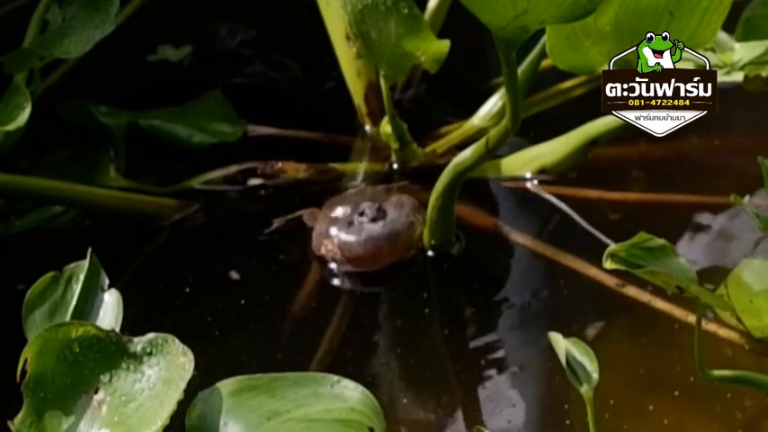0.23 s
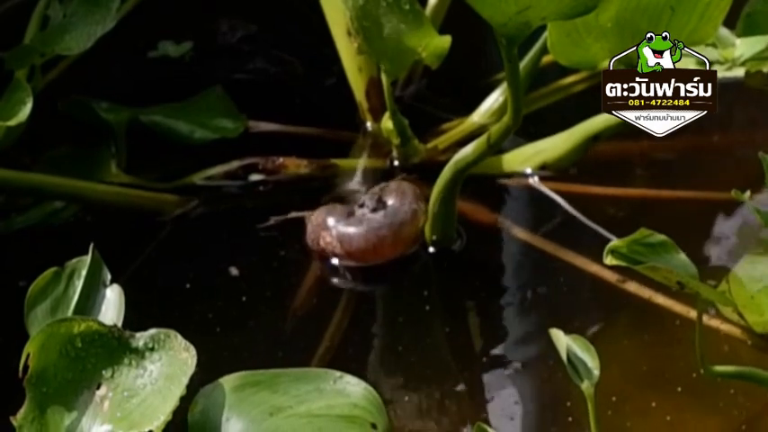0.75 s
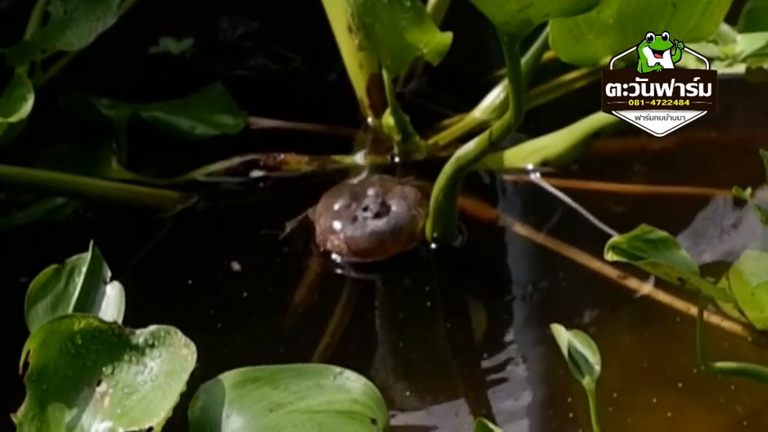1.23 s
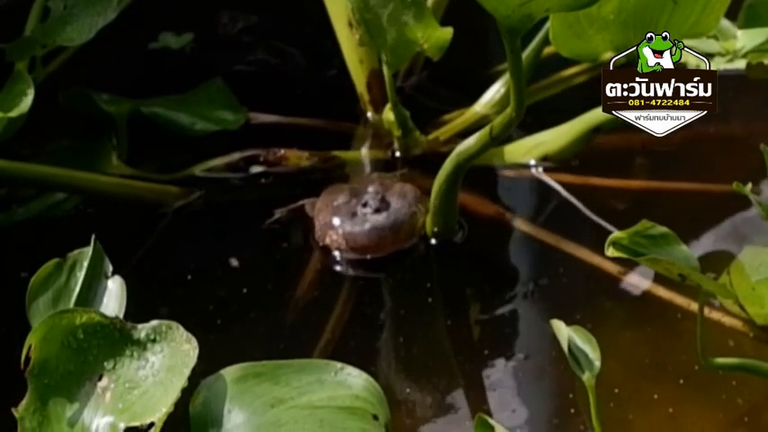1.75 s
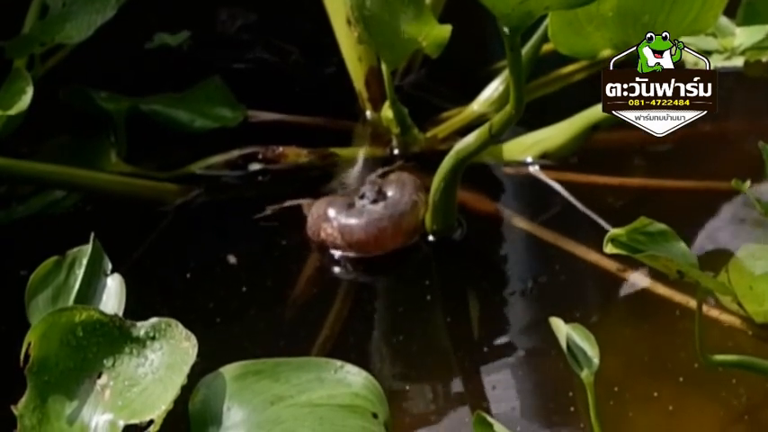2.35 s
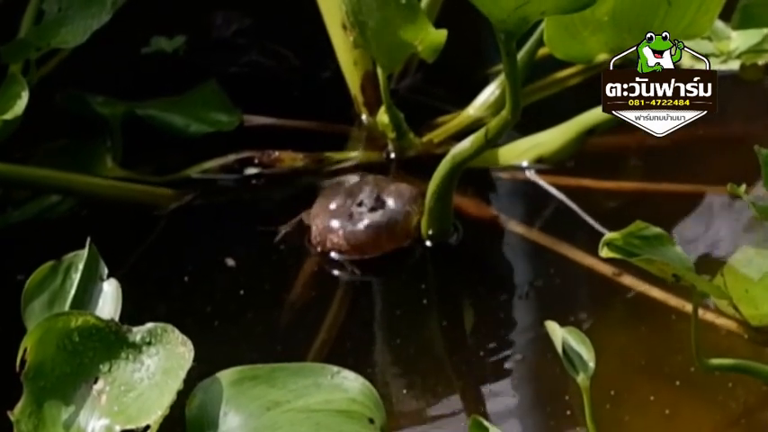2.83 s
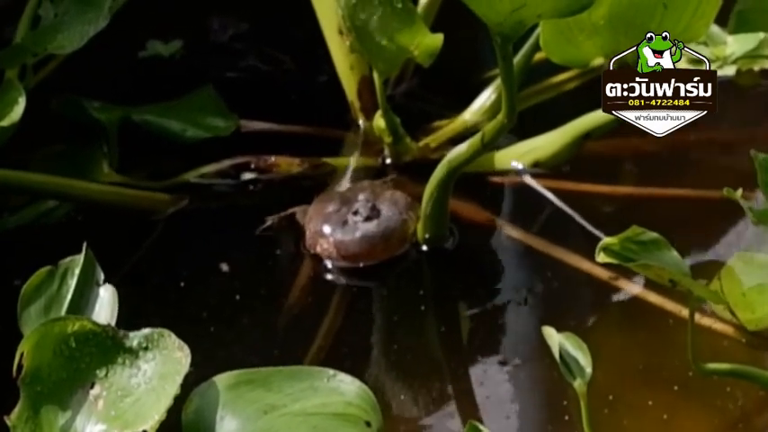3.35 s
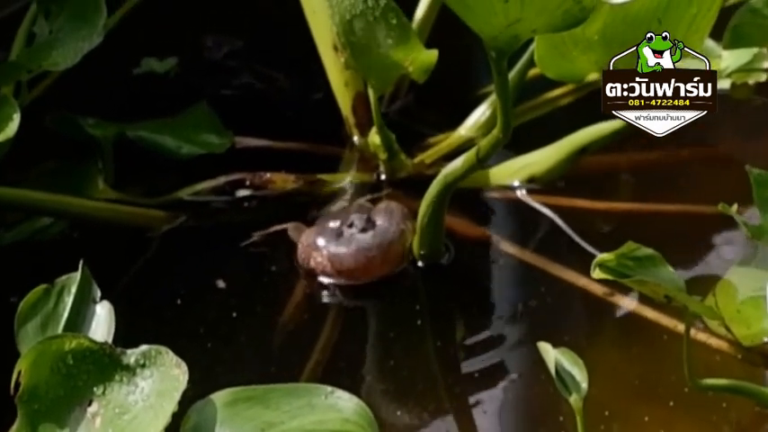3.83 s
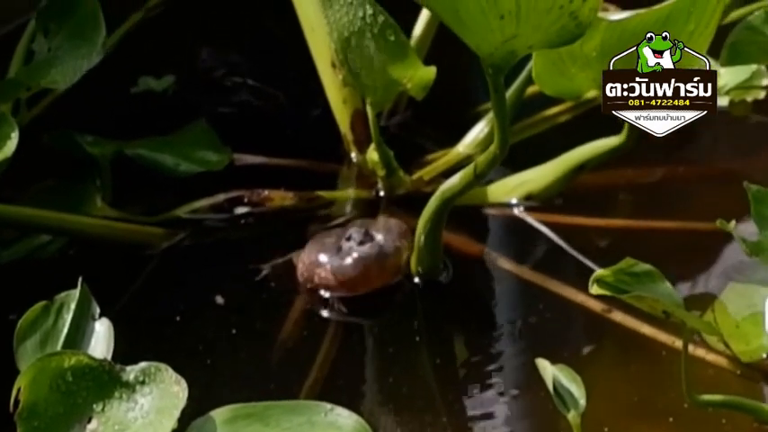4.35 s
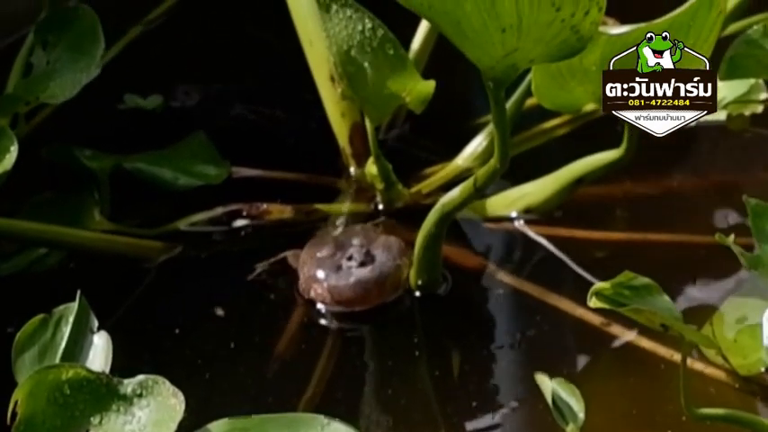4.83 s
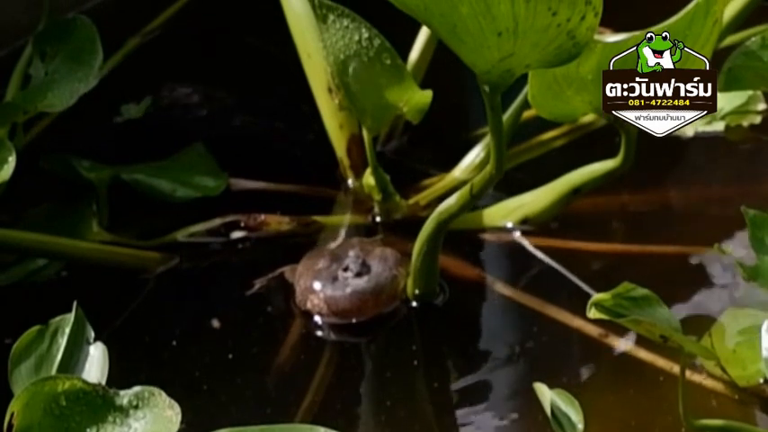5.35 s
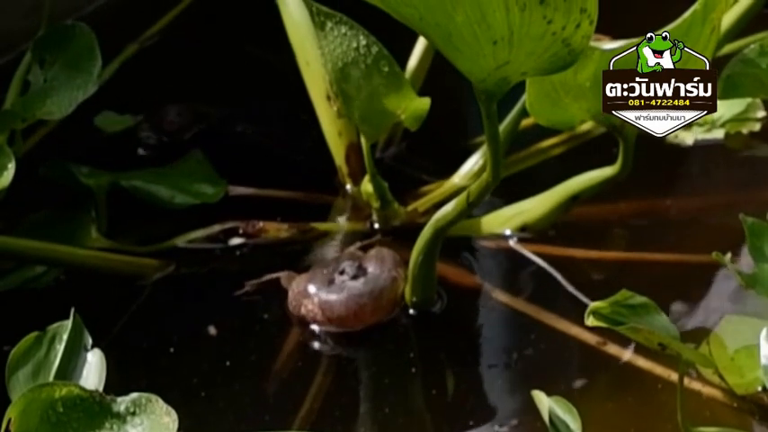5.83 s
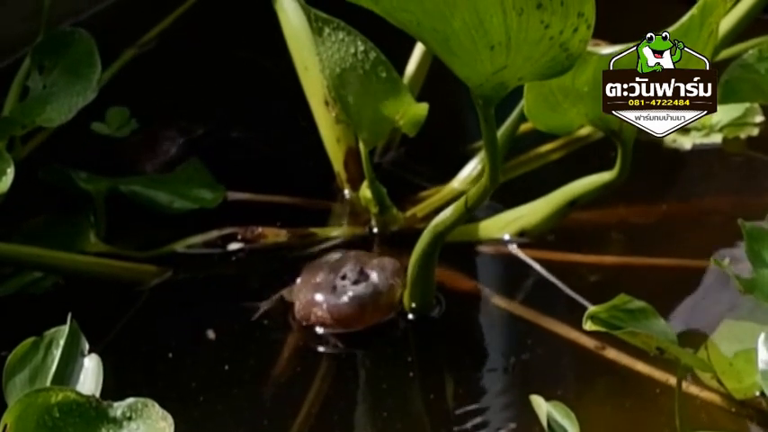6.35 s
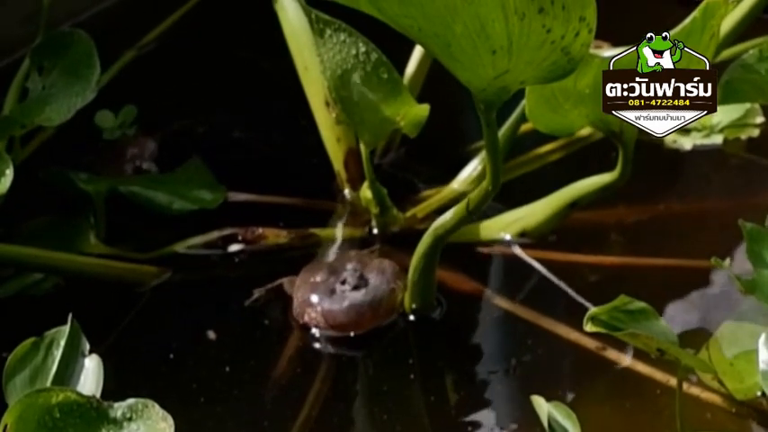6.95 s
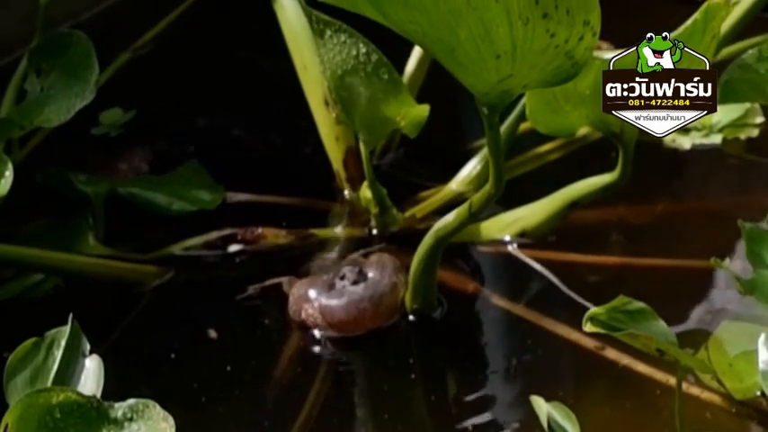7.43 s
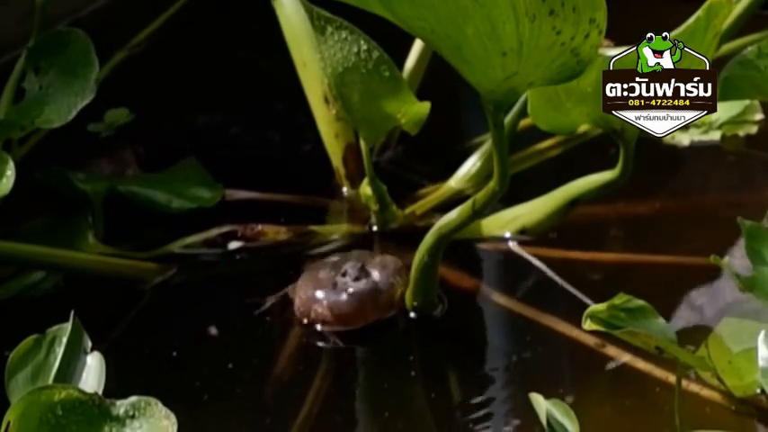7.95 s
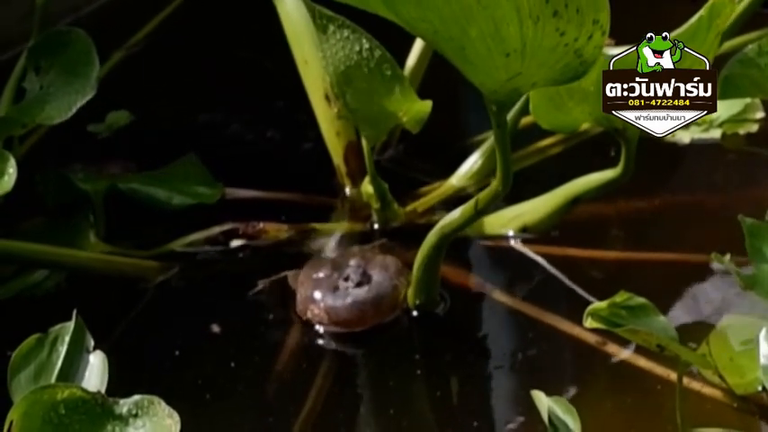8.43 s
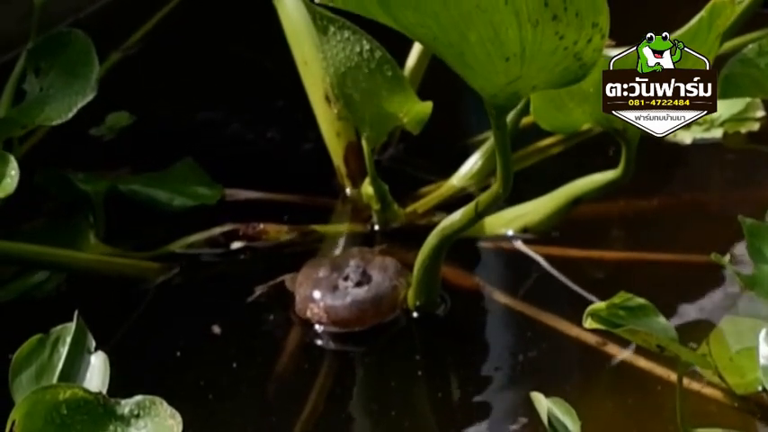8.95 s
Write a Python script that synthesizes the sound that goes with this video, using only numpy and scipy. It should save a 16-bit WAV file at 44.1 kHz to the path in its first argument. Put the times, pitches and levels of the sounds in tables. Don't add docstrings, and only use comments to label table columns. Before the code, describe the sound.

A bloated frog close by repeats short, nasal, pulsing croaks about once a second while fainter neighbours answer over a rattling pond chorus.

```python
import sys
import numpy as np
from scipy import signal
from scipy.io import wavfile
from scipy.ndimage import uniform_filter1d, map_coordinates

SR = 44100
rng = np.random.default_rng(int(sys.argv[2]) if len(sys.argv) > 2 else 0)


def inscribe(sig):
    pcm = np.round(np.clip(np.atleast_2d(sig).T, -1, 1) * 32767)
    wavfile.write(sys.argv[1], SR, pcm.astype(np.int16))


def volts_from_db(level):
    exponent = np.asarray(level, float) / 20
    return 10 ** exponent


N = 405279

# (first pulse [s], steady train sets in [s], voice fades [s], pulses in the train [count],
# first pulse peak [dB])
NEAR_CALLS = [
    (0.2201, 0.2976, 0.5841, 17, -13.2),
    (1.2738, 1.3561, 1.6298, 16, -11.7),
    (2.0636, 2.1253, 2.4263, 18, -12.7),
    (3.0819, 3.1514, 3.425, 16, -12.2),
    (3.8973, 3.9695, 4.234, 16, -12.8),
    (4.5923, 4.6639, 4.9528, 18, -14.2),
    (5.6619, 5.7358, 6.019, 17, -12.0),
    (6.4051, 6.4672, 6.7582, 18, -16.8),
    (7.7341, 7.7987, 8.0486, 14, -11.5),
    (8.5906, 8.6497, 8.8615, 12, -22.5),
]
NEAR_TOP = [-6.5, -4.5, -4, -4, -3, 4, -4.5, 2.5, -3, -3]
# (start [Hz], sac full [Hz], level at start [dB], level at end [dB], t60 [s])
BODY_MODES = [(770, 788.6, -7.5, -4, 0.039), (518, 633, -13.5, -14.5, 0.03), (679, 890, 1, 0, 0.012),
              (1490, 1300, -26.5, -19.5, 0.013)]
BODY_MODES += [(2340, 1570, -37, -39, 0.055), (3760, 2680, -28, -37, 0.028),
               (5600, 4300, -64, -49, 0.045), (7600, 6500, -78, -62, 0.03)]
# (frequency [Hz], width [Hz], level [dB])
DIPS_AND_LIFTS = [(1940, 85, -14), (3000, 50, -12), (3330, 130, -8), (4800, 60, -10), (1740, 70, 5),
                  (2890, 45, 8)]
# (first pulse [s], last pulse [s], gaps [count])
NEIGHBOUR_CALLS = [
    (0.058, 0.181, 7),
    (0.7049, 0.9536, 14),
    (1.0042, 1.199, 11),
    (1.636, 1.824, 11),
    (2.638, 2.892, 15),
    (3.437, 3.7132, 15),
    (5.1709, 5.4192, 14),
    (7.1715, 7.4076, 14),
    (8.872, 9.007, 7),
    (9.064, 9.1935, 8),
]
# (start [dB], end [dB])
NEIGHBOUR_LEVELS = [(-31, -29), (-33, -33), (-23.5, -26.5), (-32.5, -27.5), (-33, -28), (-31, -28),
                    (-30, -26), (-37, -34.5), (-31.5, -30), (-19, -23.5)]
# (low mode [Hz], its t60 [s], high mode [Hz], its level [dB], left-right [dB], stutter's
# second pulse [dB])
NEIGHBOUR_VOICES = [(537, 0.017, 756, -7.5, 7.5, -20), (520, 0.025, 736, -0.5, 7.5, -19),
                    (611, 0.017, 880, -12.5, 8.5, -9), (625, 0.017, 886, -12, 9, -18),
                    (622, 0.013, 884, -13, 9, -20), (634, 0.0216, 948, 1.5, 12, -20),
                    (570, 0.0085, 817, -14.5, 9, -6), (471, 0.021, 855, -5.5, 4.5, -5),
                    (597, 0.023, 810, -6, 7, -12), (572, 0.035, 780, -7.5, 4, -15)]
# (time [s], peak [dB], frequency [Hz])
STRAY_PULSES = [(1.845, -39.5, 445), (1.856, -52, 400), (3.044, -49, 510), (3.74, -41.5, 382),
                (4.533, -40, 560), (4.543, -38, 800), (4.5525, -29.5, 600), (4.561, -32, 850),
                (4.578, -31, 620), (4.5849, -17.5, 760), (7.5428, -38, 520), (5.164, -46, 430),
                (5.429, -52, 413), (6.055, -40, 447), (6.068, -44, 397.6), (6.094, -46.5, 760),
                (6.379, -41.5, 520), (6.787, -41, 450), (6.811, -44, 468), (6.833, -40, 396),
                (8.073, -43, 443), (8.088, -41.5, 424), (9.011, -42, 520), (9.068, -31, 560),
                (7.556, -49, 200), (9.075, -32, 1220), (9.078, -38, 1710), (9.095, -32.5, 1110)]
# (time [s], level [dB])
CHORUS_LEVEL = [(0, -55), (.6, -51.5), (1.2, -52.5), (1.9, -53), (2.6, -52), (3.3, -51.5), (4, -53),
                (4.6, -51.5), (5.3, -51.5), (6, -52.5), (6.7, -53.5), (7.1, -54.5), (7.3, -51), (7.8, -50),
                (8.5, -52.5), (9.19, -53.5)]
# (frequency [Hz], level [dB], t60 [s])
RATTLE_MODES = [(1552, -3, 0.028), (2230, -3, 0.013), (2937, 14, 0.0069), (3160, -5.5, 0.005),
                (4500, -16.5, 0.002)]
# (frequency [Hz], density [dB per Hz])
FAR_COLOUR = [(71, -61), (120, -32), (149, -26.5), (221, -28.5), (279, -14.5), (382, -39), (726, -15),
              (1110, -32), (1360, -9.5), (1510, -10.5), (1880, -18), (2920, -8), (3360, -27), (4460, -33.5),
              (5050, -35), (6560, -58), (11100, -120)]
# (frequency [Hz], likeness [0-1])
STEREO_LIKENESS = [(60, 0.7), (180, 0.48), (530, 1), (1550, 0.18), (4600, 0.29)]
# (time [s], length [s], level [dB])
SHRILL_CHIRPS = [
    (3.694, .05, -48.5),
    (5.376, .05, -46.5),
    (7.234, 0.17, -58),
]
# (time [s], level [dB])
GUSTS = [(0, -100), (1.15, -100), (1.43, -71), (1.7, -75.5), (2.15, -67), (2.6, -79.5), (2.9, -68.5),
         (3.6, -90.5), (5.5, -96), (6.1, -86), (8.5, -93.5), (8.7, -78.5), (9, -100), (9.19, -73)]
# (time [s], drone [Hz], level [dB])
ENGINE_DRONE = [
    (0, 60.86, -91),
    (6.5, 65.5, -86),
    (7.2, 67.5, -80.5),
    (7.55, 76, -65),
    (7.8, 67, -82),
    (8.1, 79, -80),
    (8.45, 74.2, -73),
    (8.6, 76.7, -87),
]
# (from [s], to [s])
LOST_SOUND = [
    (8.5175, 8.5505),
    (8.5575, 8.5903),
]


def near_frog():
    out, clicks = np.zeros(N), np.zeros(N)
    start_hz, full_hz, start_db, end_db, t60 = np.transpose(BODY_MODES)
    fill_s, lost_s = 0.22, 0.033
    for number, (call, top_db) in enumerate(zip(NEAR_CALLS, NEAR_TOP)):
        s, db = near_pulses(*call)
        age = np.maximum(s - call[0], 0) + lost_s * (number == len(NEAR_CALLS) - 1)
        full = 1 - np.exp(-age / fill_s)[:, None]
        hz = start_hz + (full_hz - start_hz) * full
        hz = hz * (1 + 0.0018 * rng.standard_normal((len(s), len(t60))))
        level = start_db + (end_db - start_db) * full
        level = level + sum(dip_db * np.exp(-((hz - at_hz) / width) ** 2) for at_hz, width, dip_db in DIPS_AND_LIFTS)
        level[:, 3:] += 3.0 * rng.standard_normal((len(s), len(t60) - 3))
        level[:, 6:] += top_db
        add(out, s, db + 1.14, struck(hz, level, t60, rise_s=0.001))
        opening_db = 11 * np.exp(-age / 0.093)
        click_db = db + 15.5 + opening_db + 2 * rng.standard_normal(len(s))
        clicks[((s - 0.0012) * SR).astype(int)] = volts_from_db(click_db)
    burst = signal.lfilter([0.3], [1, -0.985], clicks) * rng.standard_normal(N)
    snap = band(burst, 4, [2600, 4050])
    spit = band(burst * np.abs(burst), 2, [4000, 7500])
    thump = band(np.minimum(clicks, volts_from_db(-1.0)), 2, [85, 210])
    out = band(out, 3, 400, "high")
    out = out + volts_from_db(-32) * snap + volts_from_db(-14.5) * thump
    out = out + volts_from_db(-50.5) * spit
    late = np.r_[0, 0, out[:-2]]
    return np.array([late * volts_from_db(-1.2), out * volts_from_db(1.1)]) + pond(out, wet_db=-30, t60=0.07)


def near_pulses(first_s, train_s, fade_s, count, first_db):
    lead_s, stutter_s, hesitation_s, last_s = 0.021, 0.0094, [0.0141, 0.0202, 0.0193], 0.014
    hold_db, stutter_db = -13.5, -14.8
    quick = int(np.ceil((train_s - first_s - sum(hesitation_s)) / 0.0125))
    opening = np.r_[[stutter_s] * quick, hesitation_s]
    opening = opening * (train_s - first_s) / opening.sum()
    k = np.arange(count)
    train = 0.0174 - 0.0024 * np.exp(-k / 3.0) + 0.0017 * (k % 3 == 2)
    rush = 0.62 ** k[::-1]
    train = train - rush * (train.sum() - fade_s + train_s) / rush.sum()
    gaps = np.r_[-lead_s, lead_s, opening, train, last_s]
    train_db = hold_db - 1.67 * k / count - 6.5 * 0.14 ** k[::-1]
    db = np.r_[-33.5, first_db, [stutter_db] * quick, [hold_db] * len(hesitation_s), train_db, -28.5]
    chance = rng.standard_normal((len(db), 2))
    return first_s + np.cumsum(gaps) + 0.0003 * chance[:, 0], db + 0.25 * chance[:, 1]


def neighbours():
    out = np.zeros((2, N))
    for call, ends_db, voicing in zip(NEIGHBOUR_CALLS, NEIGHBOUR_LEVELS, NEIGHBOUR_VOICES):
        low_hz, t60, high_hz, high_db, pan_db, second_db = voicing
        s, db = neighbour_pulses(*call, *ends_db)
        swell = np.linspace([1, 0.95], [1, 1.05], len(s))
        hz = np.array([high_hz, low_hz]) * swell * (1 + 0.015 * rng.standard_normal((len(s), 2)))
        level = [high_db, 0] + 2 * rng.standard_normal((len(s), 2))
        rings = struck(hz, level, [0.02, t60], rise_s=0.0022)
        voice = np.zeros(N)
        add(voice, s, db, rings)
        wobble = rng.standard_normal((2, len(s)))
        second_s = s + 0.00592 + 0.001 * wobble[0]
        fade_db = 10.5 * np.linspace(0.5, -0.5, len(s))
        add(voice, second_s, db + second_db + fade_db + 2.0 * wobble[1], rings)
        out += voice * volts_from_db(np.array([[pan_db], [-pan_db]]) / 2)
    s, db, hz = np.transpose(STRAY_PULSES)
    add(out, s, db, struck(hz[:, None], 0 * hz[:, None], [0.02], rise_s=0.00067))
    out[0] = np.roll(out[0], 3)
    out = band(out, 4, 380, "high")
    out = out + volts_from_db(-23) * band(np.abs(out), 2, [140, 300])
    return out + pond(out.mean(axis=0), wet_db=-20, t60=0.08)


def neighbour_pulses(first_s, last_s, gaps, start_db, end_db):
    k = np.arange(round(gaps) + 1)
    edges = np.exp(-k / 0.6) + np.exp(-k[::-1] / 0.6)
    chance = rng.standard_normal((len(k), 2))
    s = np.linspace(first_s, last_s, len(k)) + 0.0013 * chance[:, 0]
    db = np.linspace(start_db, end_db, len(k)) - 11 * edges + 1.5 * chance[:, 1]
    return s, db


def rattles():
    out = np.zeros((2, N))
    for _ in range(15):
        size, pan_db, level_db, lag = rng.uniform([0.84, -7.5, -4, 6], [1.06, 8.5, 11, 14])
        turns = lag + np.cumsum(39 * size * (1 + 0.05 * drift(4))) / SR
        clicks = np.diff(np.floor(turns), append=0) > 0
        clicks = clicks * (drift(1.6) > 0) * volts_from_db(level_db + 3.0 * drift(25))
        voice = 0
        for hz, db, t60 in RATTLE_MODES:
            r, w = volts_from_db(-60 / (t60 * SR)), 2 * np.pi * hz * size / SR
            resonator = [0, volts_from_db(db) * np.sin(w)], [1, -2 * r * np.cos(w), r * r]
            voice = voice + signal.lfilter(*resonator, clicks + 1e-18)
        out += np.array([voice * volts_from_db(pan_db / 2), np.roll(voice, int(lag) - 13) * volts_from_db(-pan_db / 2)])
    out = band(out, 3, [1150, 3900])
    return rms_one(out + pond(out.mean(axis=0), wet_db=-7, t60=0.07))


def far_chorus():
    out, edges = 0, 130 * 2 ** np.arange(0, 7, 1 / 3)
    white = rng.standard_normal((2, 2, N))
    alike_hz, likeness = np.transpose(STEREO_LIKENESS)
    colour_hz, colour_db = np.transpose(FAR_COLOUR)
    for k, (low, high) in enumerate(zip(edges, edges[1:])):
        mid, side = band(white[k % 2], 2, [low, high])
        at = np.log(low * high) / 2
        alike = np.clip(np.interp(at, np.log(alike_hz), likeness), 0, 1)
        db = np.interp(at, np.log(colour_hz), colour_db)
        gain = volts_from_db(db + 0.5 * drift(1.7) + 2.1 * drift(45))
        out = out + gain * (np.sqrt(1 + alike) * mid + np.sqrt(1 - alike) * side * [[1], [-1]])
    return rms_one(out)


def gain_control(loud):
    depth_db, sink_s, climb_db_s = 15, 0.024, 12.5
    spring_share, spring_s = 0.57, 0.012
    calling = uniform_filter1d(loud ** 2, size=900) > volts_from_db(-64)
    r, q = np.exp(-1 / (np.array([sink_s, spring_s]) * SR))
    sunk_db = signal.lfilter([1 - r], [1, -r], depth_db * calling) * calling
    climb = climb_db_s * np.arange(N) / SR
    slow_db = np.maximum.accumulate((1 - spring_share) * sunk_db + climb) - climb
    spring_db = signal.lfilter([1 - q], [1, -q], spring_share * sunk_db)
    return volts_from_db(-slow_db - spring_db)


def chirps():
    t = np.arange(N) / SR
    on = 0
    for s, length, db in SHRILL_CHIRPS:
        on = on + volts_from_db(db) * np.clip(np.minimum((t - s) / 0.004, (s + length - t) / 0.02), 0, 1)
    low_hz, split_hz, high_hz = 2900, 3600, 4220
    rasp = rng.standard_normal((2, N)) * (1 + 0.49 * np.sin(2 * np.pi * 130 * t))
    body = band(rasp, 2, [low_hz, split_hz])
    edge = band(rasp, 2, [split_hz, high_hz])
    return on * rms_one(body + volts_from_db(-12) * edge) * volts_from_db(np.array([[2.0], [-2.0]]))


def knock():
    age = np.arange(N) / SR - LOST_SOUND[1][1]
    click = rng.standard_normal(N) * np.exp(-np.abs(age) / 0.00027) * volts_from_db(-40.5 + np.array([[3.5], [-3.5]]))
    mid, side = band(rng.standard_normal((2, N)), 2, [45, 230])
    rumble = rms_one(mid + 0.41 * side * [[1], [-1]])
    return click + rumble * volts_from_db(-51 - 60 * np.abs(age) / 0.85) * (age > 0)


def low_end(loud):
    (wind_db,), (engine_hz, engine_db) = in_time(GUSTS), in_time(ENGINE_DRONE)
    mid, side = band(rng.standard_normal((2, N)), 3, [22, 62])
    shake = volts_from_db(-79) * rms_one(uniform_filter1d(np.abs(loud), size=3000))
    wind = rms_one(mid + side * volts_from_db(-1.5) * [[1], [-1]])
    wind = wind * (volts_from_db(wind_db + 6.5) + shake) * volts_from_db(1.2 * drift(23))
    drone = np.sin(2 * np.pi * np.cumsum(engine_hz) / SR)
    engine = np.sqrt(2) * volts_from_db(engine_db + 1.3 * drift(11.0)) * drone
    return (wind + engine) * volts_from_db(np.array([[-1.5], [1.5]]))


def struck(hz, db, t60, rise_s):
    t = np.arange(1800) / SR
    out = 0
    for k in range(np.shape(hz)[1]):
        decay = volts_from_db(db[:, [k]] - 60 * t / t60[k])
        out = out + (-1) ** (k + 1) * decay * np.sin(2 * np.pi * hz[:, [k]] * t)
    return out * (1 - np.exp(-t / rise_s)) ** 3


def pond(x, wet_db, t60):
    t = np.arange(SR // 4) / SR
    tail = rng.standard_normal((2, len(t))) * volts_from_db(-60 * t / t60) * (t > 0.004)
    tail = signal.lfilter([0.3], [1, -0.7], tail)
    tail = rms_one(tail) / np.sqrt(len(t))
    return volts_from_db(wet_db) * signal.fftconvolve(x[None], tail, axes=1)[:, :N]


def add(track, times, peak_db, rings):
    for s, db, ring in zip(times, peak_db, rings):
        i = round(s * SR) - np.argmax(ring)
        track[..., i:i + len(ring)] += (ring * volts_from_db(db) / ring.max())[:max(N - i, 0)]


def band(x, order, hz, kind="band"):
    return signal.sosfilt(signal.butter(order, hz, kind, fs=SR, output="sos"), x)


def in_time(rows):
    s, *columns = np.transpose(rows)
    return [np.interp(np.arange(N) / SR, s, c) for c in columns]


def rms_one(x):
    return x / np.sqrt(np.mean(x ** 2) + 1e-20)


def drift(rate):
    knots = rng.standard_normal(int(N / SR * rate) + 3)
    return rms_one(map_coordinates(knots, [np.arange(N) / SR * rate], order=3))


def scene():
    level_db, = in_time(CHORUS_LEVEL)
    clear = 0.76
    small = volts_from_db(level_db + 7.5) * (np.sqrt(clear) * rattles() + np.sqrt(1 - clear) * far_chorus())
    near = near_frog()
    small = small * gain_control(near[1]) * volts_from_db(np.array([[1.5], [-1.5]]))
    return near + neighbours() + small + chirps() + low_end(near[1]) + knock()


def roll_off(x):
    return signal.sosfilt(signal.butter(12, 15700, fs=SR, output="sos"), x)


def record(dry):
    t = np.arange(N) / SR
    kept = np.prod([(t < a) | (t >= b) for a, b in LOST_SOUND], axis=0)
    kept = uniform_filter1d(kept * 1.0, size=2)
    hiss = volts_from_db(-83.5) * rng.standard_normal(dry.shape)
    return roll_off((dry + hiss) * kept)


dry = scene()
out = record(dry)
inscribe(out)
```